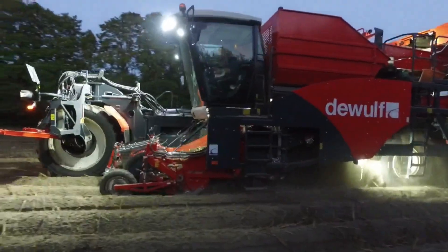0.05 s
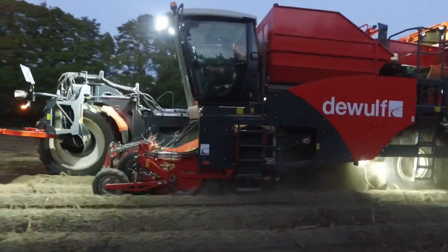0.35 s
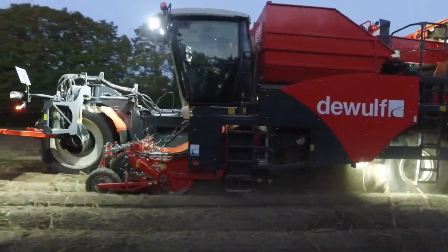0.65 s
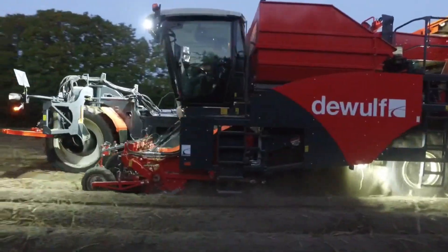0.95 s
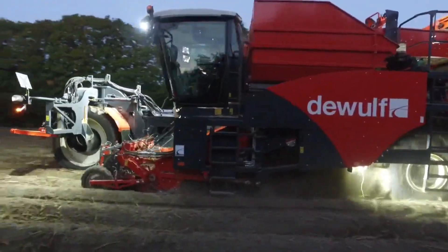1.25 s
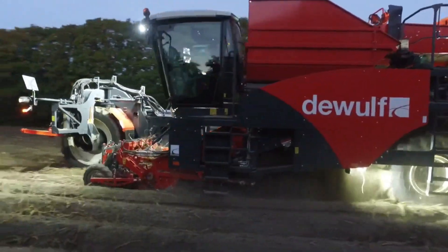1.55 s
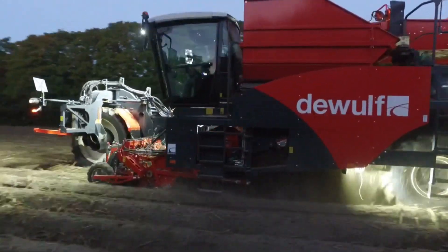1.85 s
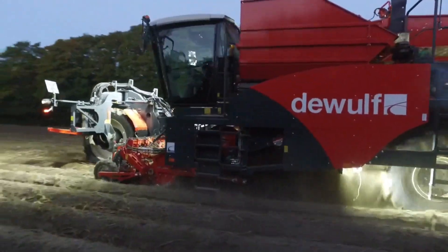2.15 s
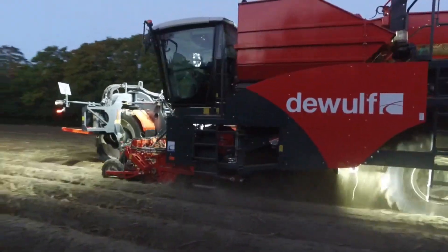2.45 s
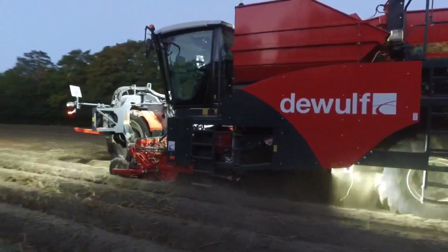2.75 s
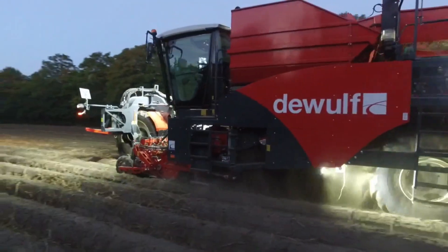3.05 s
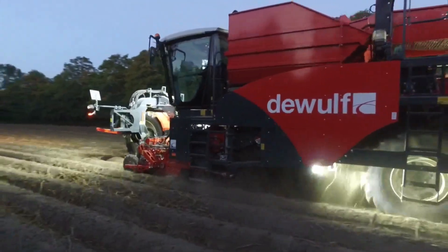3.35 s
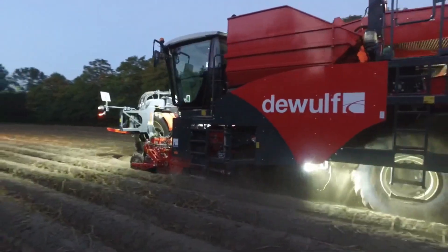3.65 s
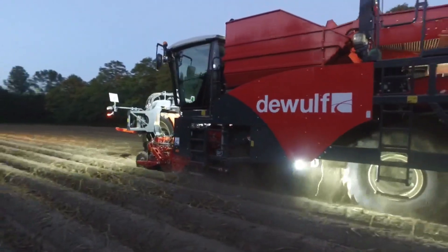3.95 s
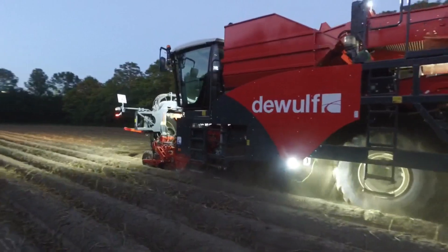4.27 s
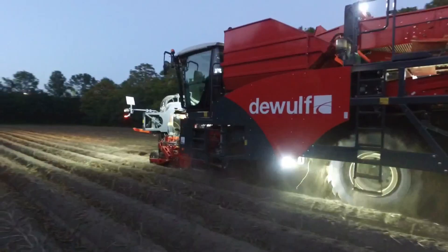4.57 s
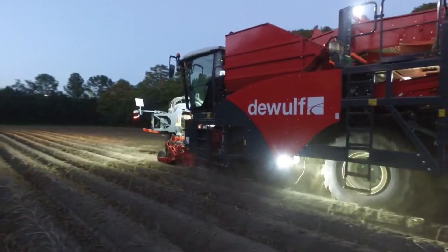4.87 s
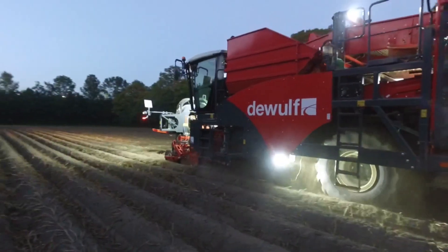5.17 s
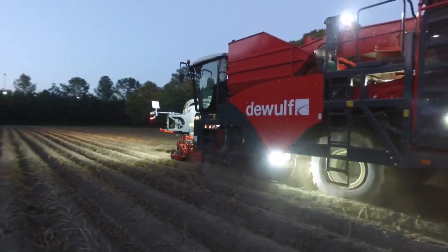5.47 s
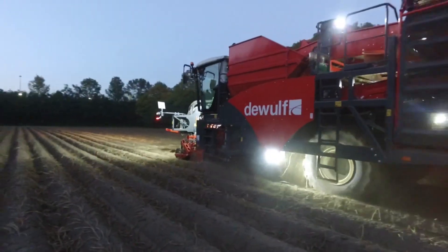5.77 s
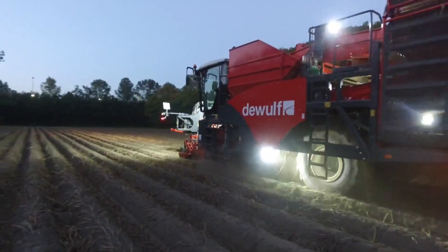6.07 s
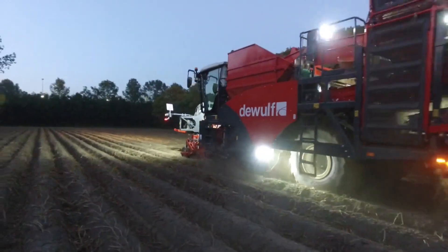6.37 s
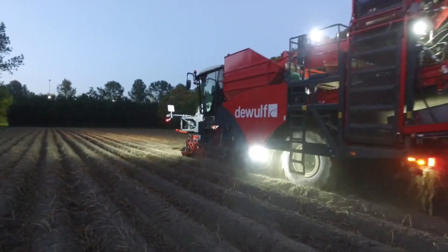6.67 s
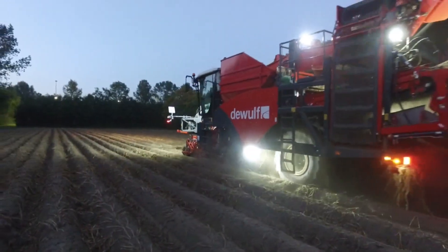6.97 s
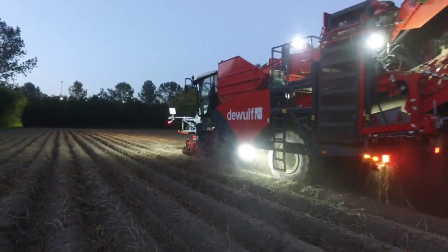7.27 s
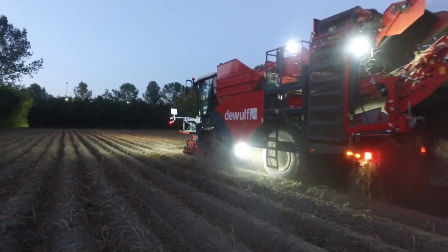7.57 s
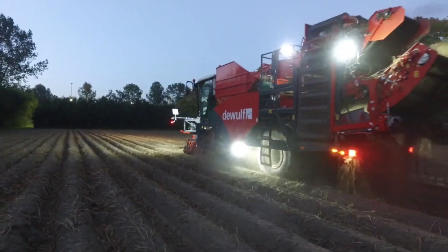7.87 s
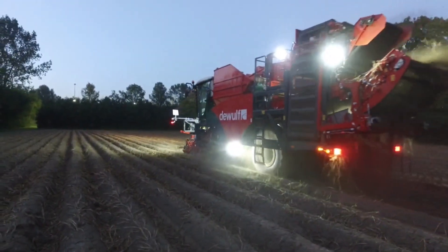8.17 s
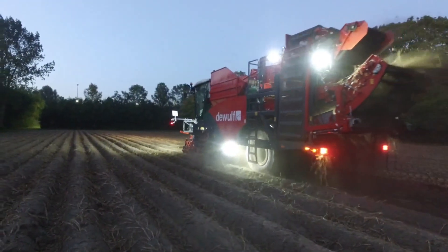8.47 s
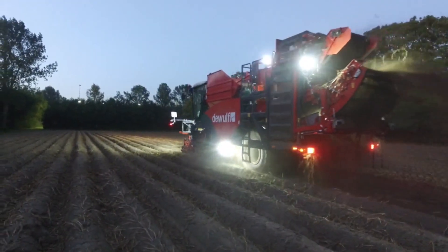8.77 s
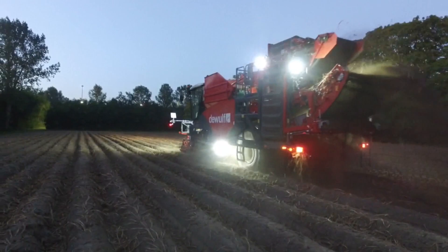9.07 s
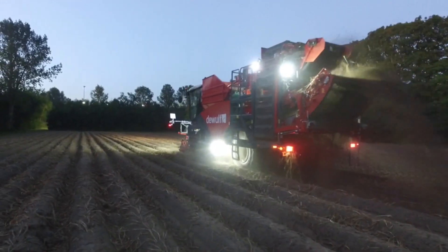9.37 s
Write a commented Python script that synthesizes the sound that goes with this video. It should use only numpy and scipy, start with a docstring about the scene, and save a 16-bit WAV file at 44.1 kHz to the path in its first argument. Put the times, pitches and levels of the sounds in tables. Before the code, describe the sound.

Steady roar of a farm harvester crawling by outdoors, its sieves and conveyor clattering over a low engine drone and wavering whine.

```python
"""In an open field a self-propelled potato harvester crawls past, its diesel held at working speed.
Each part swells and fades with its distance: first the droning exhaust and a whining hydraulic pump,
then the rattling sieve webs with soil hissing through them, last the tail and its conveyor.
Periodic forces (firings, pistons, blades) give tones, and dense random impacts give noise.
The conveyor drive sings under changing load; stones, grit and a clod strike the steel."""
import sys
import numpy as np
from scipy import signal
from scipy.fft import rfft, irfft, next_fast_len
from scipy.io import wavfile
from scipy.ndimage import map_coordinates

SR = 44100
rng = np.random.default_rng(int(sys.argv[2]) if len(sys.argv) > 2 else 0)


def digitize_waveform(pressure):
    """Quantize a signal to 16-bit integers and store it at the path in sys.argv[1].

    Rows of a 2-D input are taken as channels; values are limited to [-1, 1].
    """
    field = np.atleast_2d(pressure).T
    bounded = np.clip(field, -1, 1)
    quanta = np.round(bounded * 32767).astype(np.int16)
    wavfile.write(sys.argv[1], SR, quanta)


N = 424241
SPEED_M_PER_S, SOUND_M_PER_S = 1.2, 343
FIRING_HZ, PISTON_HZ = 60.0, 383.5

# Passing parts: (time when nearest [s], distance [m], level there [dB], loss per doubling [dB])
EXHAUST_PASS = (0.14, 8, -26.5, 18)
PANELS_PASS = (10, 20, -26, 8)
WEBS_PASS = (3.5, 4.5, -26, 4)
TAIL_PASS = (8, 1, -28, 5)
TURBO_PASS = (6, 0.5, -52, 2)
CONVEYOR_PASS = (7, 1.17, -31, 18)

# Envelopes of the steady sources: (time [s], relative level [dB])
FAN_LEVEL = [(0, -36.5), (1.3, -39.5), (3.1, -30.5), (3.6, -39.5), (4.25, -32.5), (5.3, -38), (6.3, -37),
             (6.95, -30.5), (7.8, -35.5), (9.62, -44)]
BOOM_LEVEL = [(0, -35), (2.3, -35.5), (3.2, -31.5), (4.3, -36.5), (5.6, -39), (6, -50), (6.7, -40),
              (7.2, -36.5), (7.9, -34.5), (8.4, -35), (9.62, -34.5)]
CHASSIS_LEVEL = [(0, -24.5), (1.35, -28), (2.3, -24), (3.6, -25), (4.3, -21.5), (4.9, -26.5), (5.9, -24.5),
                 (6.4, -29), (7.1, -29), (7.4, -25), (8.6, -25.5), (9.62, -28.5)]
SOIL_LEVEL = [(0, -40.5), (2, -38.5), (3.5, -36.5), (5.2, -35.5), (7.2, -36.5), (7.8, -36.5), (8.4, -38),
              (8.9, -39.5), (9.62, -40.5)]
# Noise spectra of the parts: (frequency [Hz], relative spectral density [dB])
CHASSIS_SPECTRUM = [(18, -62), (31, -39), (45, -33), (70, -6.5), (86, -5.5), (104, -2), (122, 1.5),
                    (142, 0), (170, -5.5), (230, -17.5), (400, -22.5), (1000, -78)]
PANEL_SIDE_SPECTRUM = [(120, -8), (200, 0), (245, 1.5), (280, 1.5), (330, 1.5), (370, -5.5), (430, -2),
                       (520, -12.5), (700, -7.5), (810, -4), (900, -10.5), (1100, -32), (2500, -43)]
PANEL_REAR_SPECTRUM = [(120, -9), (190, -6), (240, -3.5), (280, 3.5), (350, -8), (410, -3), (520, -10.5),
                       (620, -7.5), (750, -1.5), (830, -6), (940, -16), (1150, -9), (2500, -49.5)]
WEB_SIDE_SPECTRUM = [(530, -3), (900, -1.5), (1050, -4.5), (1370, -2), (1510, -3.5), (1820, -5),
                     (1970, -5.5), (2370, -4), (2570, -5), (2650, -4.5), (3130, -10.5), (3230, -10.5),
                     (3850, -15), (4960, -19.5), (6000, -18.5), (7800, -77), (13200, -120)]
WEB_REAR_SPECTRUM = [(530, -21), (900, 2), (959, -8), (1150, -6.5), (1260, -0.5), (1390, -3.5), (1610, -3),
                     (1810, 1.5), (2170, -2), (2350, 2), (2510, -0.5), (2780, -0.5), (3470, -7),
                     (4770, -29), (6000, -27), (7800, -48), (13200, -120)]
SOIL_SPECTRUM = [(2000, -4.5), (4000, 2.5), (5500, -0.5), (6800, -2.5), (7300, -0.5), (8100, -2),
                 (8700, -5.5), (9300, -28), (10600, -21), (12100, -9.5), (13000, -20), (14000, -18)]
CONVEYOR_SPECTRUM = [(700, -25), (1100, -1), (1600, -1.5), (2100, 0), (3000, -2.5), (4200, -10),
                     (5200, -28), (9000, -42)]
SHEET_SPECTRUM = [(150, -20), (400, -6), (560, -4), (690, 1), (1000, -8), (1600, -12), (2800, -9),
                  (3600, -15), (4300, -28), (7500, -31), (10000, -60)]
# Shaker harmonics: (multiple of its rate, level relative to the chassis envelope [dB])
SHAKER_HARMONICS = [(11, -9), (12, -11), (13, -17), (17, -16)]
# Web links rubbing: (peak time [s], half width [s], pitch [Hz], level [dB])
LINK_SQUEALS = [(2.91, .02, 4960, -41.5), (3.22, .03, 4960, -47), (3.37, .015, 4965, -41.5),
                (3.57, .02, 4930, -41), (4.44, .04, 4935, -45), (5, .04, 4940, -47), (3.08, .05, 4170, -46),
                (3.96, .04, 4180, -44), (4.33, .2, 4175, -47.5)]
# Loads of crop: (peak time [s], half width [s], centre [Hz], band width [octaves], level [dB])
CROP_LOADS = [(6.61, .025, 3700, .2, -34), (6.78, .04, 3600, .2, -39), (6.98, .07, 4000, .15, -39.5),
              (7.1, .035, 2200, .4, -28.5), (7.85, .03, 3900, .2, -35.5), (7.97, .1, 3420, .05, -44),
              (8.26, .045, 3470, .05, -38), (8.46, .05, 3440, .05, -42), (8.94, .06, 2400, .5, -33.5),
              (9.26, .045, 2300, .5, -33), (9.48, .08, 2200, .5, -34)]
# Spills of grit: (time [s], relative level [dB], centre [Hz], t60 [s])
GRIT_SPILLS = [(.287, -33, 4700, .1), (.511, -33, 4300, .08), (.758, -35, 4200, .05),
               (1.318, -39, 6500, .05), (1.45, -38, 4500, .3), (1.508, -31.5, 3700, .15),
               (1.537, -30.5, 4800, .22), (1.562, -30, 2700, .12), (1.595, -32.5, 4200, .2),
               (1.636, -35, 6800, .13), (1.711, -31, 5000, .06), (2.312, -34.5, 5300, .06),
               (2.461, -33.5, 4530, .11), (2.463, -37, 7400, .11), (3.3, -34.5, 3900, .14),
               (3.465, -35, 3700, .09), (5.241, -34, 5500, .08), (5.473, -34, 5200, .07),
               (7.85, -35, 5600, .1), (8.628, -41.5, 6900, .15)]
# Blows of one tumbling clod: (time [s], level [dB], treble gain [dB])
CLOD_BLOWS = [(8.583, -26, 0), (8.596, -20.5, -3), (8.607, -20.5, 8), (8.6285, -13, -1),
              (8.6385, -11.5, -8), (8.665, -21.5, 6), (8.698, -24, -12)]
# Stones on steel: (time [s], relative level [dB], ring centre [Hz], thud gain [dB], thud pitch [Hz])
STONE_HITS = [(.478, -17, 2000, -12, 700), (.511, -16.5, 2900, -14, 700), (.5487, -14.5, 3000, -8, 600),
              (1.5374, -15, 3400, -6, 800), (1.711, -7.8, 1900, 2.5, 660), (2.0046, -13.5, 1900, -8, 800),
              (2.312, -15.5, 3200, -12, 800), (2.804, -15.5, 3000, -10, 700),
              (3.1936, -11.5, 2100, -3, 520), (3.3004, -15, 2600, -12, 600), (3.321, -13, 1500, -8, 900),
              (3.7204, -11.5, 3900, -9, 500), (3.743, -18, 1200, 4, 600), (4.0438, -6.3, 2050, -8, 800),
              (4.3458, -9, 1750, -2, 540), (4.413, -16, 1700, -8, 900), (4.6234, -11.5, 1600, -1, 520),
              (4.7087, -12.5, 1650, -14, 900), (4.913, -6.2, 2950, -4.5, 560), (5.2048, -9, 2750, -5, 950),
              (5.473, -15.5, 3700, -9, 500), (5.7905, -13.3, 2600, 4.5, 570),
              (6.6198, -14.5, 3600, -8, 600), (6.866, -15, 2400, -10, 700)]
# Modes of the frame: (frequency [Hz], relative level [dB], t60 [s])
FRAME_MODES = [(800, -4, .04), (1000, -4, .04), (1324, -3, .036), (1620, -4, .034), (2030, -1, .036),
               (2300, -4, .032), (2660, -3, .03), (3020, -1.5, .036), (3390, -7, .028), (3770, -9, .026),
               (4200, -13, .022), (4870, -17, .02)]
# Conveyor drive under load: (time [s], pitch [Hz], level [dB])
DRIVE_TONE = [(0, 835, -41), (.7, 800, -39), (1, 822, -37), (1.35, 852, -38), (1.68, 794, -35),
              (1.9, 798, -29), (2.12, 809, -25.7), (2.25, 834, -35), (2.52, 812, -35.5), (2.72, 836, -35.5),
              (3.6, 815, -40), (6.3, 808, -41), (7.1, 800, -42), (7.45, 772, -42), (7.56, 756, -31),
              (7.7, 714, -33), (7.8, 735, -36), (7.92, 742, -31), (8.05, 735, -41), (8.25, 680, -31.5),
              (8.38, 705, -33), (8.5, 690, -40), (8.66, 682, -30), (8.78, 680, -40), (8.87, 700, -32),
              (8.97, 745, -33.5), (9.15, 700, -37), (9.62, 735, -45)]
# Pump whine: (time [s], first partial [dB], second partial before its trim [dB])
PUMP_LEVELS = [(0, -42, -38), (.7, -43, -33), (1.05, -45, -46), (1.35, -40, -35), (1.65, -35.5, -32.5),
               (1.95, -41, -31), (2.2, -43, -44), (2.55, -42, -36), (2.9, -42, -32.5), (3.15, -44, -36),
               (3.45, -46, -31.5), (3.8, -35, -42), (4.05, -44, -32.5), (4.2, -48, -35), (4.35, -48, -32),
               (4.65, -47, -37), (5, -46, -44), (5.3, -45, -34), (5.58, -43, -36.5), (5.72, -31, -38),
               (6.3, -30.5, -32.5), (6.6, -39, -34.5), (7, -44, -40), (7.3, -33, -45), (7.8, -29, -34),
               (8.1, -35.5, -41), (8.7, -36, -45), (9.62, -44, -45)]
# Pump overtones: (multiple of the piston rate, level beside the cab [dB], level behind [dB])
PUMP_OVERTONES = [(3, -44.5, -51), (4, -45, -50), (5, -43, -51.5), (6, -40, -45.5), (7, -44, -48)]
# Squeals of a hydraulic pipe: (peak time [s], level [dB], half width [s])
PIPE_SQUEALS = [(.08, -48, .03), (.47, -46, .03), (.77, -41.5, .03), (.96, -36.5, .04)]
# Exhaust orders: (multiple of the firing rate, relative level [dB])
EXHAUST_ORDERS = [(1, 1.5), (1.5, -14.5), (2, -5), (3.5, -25), (4.5, -20.5), (5, -17.5)]


def amp(db):
    """Decibels to amplitude ratio."""
    return 10 ** (np.asarray(db) / 20)


def unit(x):
    """Normalisation to rms 1."""
    return x / np.sqrt(np.mean(x ** 2) + 1e-20)


def clock(size=N):
    """The time of each sample in seconds."""
    return np.arange(size) / SR


def curves(rows):
    """Linear interpolation in time of each column after the first."""
    times, *columns = np.transpose(rows)
    return [np.interp(clock(), times, column) for column in columns]


def noise(size=N):
    """Gaussian white noise."""
    return rng.standard_normal(size)


def wobble(rate):
    """Smooth random modulation: a spline through rate knots a second."""
    return map_coordinates(noise(int(N * rate / SR) + 4), [clock() * rate])


def swell(peak_s, half_width_s):
    """A Gaussian envelope; the half width is its standard deviation."""
    return np.exp(-.5 * ((clock() - peak_s) / half_width_s) ** 2)


def phase(hz):
    """Phase as the integral of frequency."""
    return 2 * np.pi * np.cumsum(hz) / SR


def filtered(x, response):
    """Filtering as multiplication of the spectrum by a frequency response."""
    size = next_fast_len(len(x) + 8192)
    return irfft(rfft(x, size) * response(np.fft.rfftfreq(size, 1 / SR)), size)[:len(x)]


def coloured(x, spectrum):
    """Spectral shaping by (frequency [Hz], level [dB]) points, at rms 1."""
    points_hz, db = np.transpose(spectrum)
    return unit(filtered(x, lambda hz: amp(np.interp(np.log(hz + 1), np.log(points_hz), db))))


def banded(x, centre_hz, octaves):
    """A band-pass, Gaussian in log frequency, at rms 1."""
    return unit(filtered(x, lambda hz: np.exp(-.5 * (np.log2((hz + 1) / centre_hz) / octaves) ** 2)))


def rattle(rate, spread_db, t60):
    """Incoherent impacts add in power: rate random contacts a second, each a dying noise burst."""
    contacts = rng.random(N) < rate / SR
    power = contacts * amp(spread_db * np.clip(noise(), -2, 2)) ** 2
    decay = amp(-60 * clock(SR // 8) / t60) ** 2
    envelope = np.sqrt(np.abs(signal.fftconvolve(power, decay)[:N]))
    return unit(envelope * noise())


def add(track, s, sound):
    """Superposition of a sound on the track at s seconds."""
    start = round(s * SR)
    track[start:start + len(sound)] += sound[:N - start]


def travelled(nearest_s):
    """Uniform motion: metres that a part has gone beyond its nearest point."""
    return SPEED_M_PER_S * (clock() - nearest_s)


def going_by(nearest_s, distance_m, db, doubling_db):
    """Distance law in dB; shielded parts lose more than 6 dB per doubling."""
    return db - doubling_db * np.log2(np.hypot(1, travelled(nearest_s) / distance_m))


def doppler(nearest_s, distance_m):
    """Doppler ratio: slightly sharp on approach, flat on retreat."""
    metres = travelled(nearest_s)
    return 1 - SPEED_M_PER_S / SOUND_M_PER_S * metres / np.hypot(metres, distance_m)


def crossfade(side, rear, start_s, end_s):
    """Equal-power crossfade from the machine's flank to its tail."""
    share = np.clip((clock() - start_s) / (end_s - start_s), 0, 1)
    return np.sqrt(1 - share) * side + np.sqrt(share) * rear


def turbocharger(pitch_hz=7942, jitter=.0014):
    """Shielding: the thin whistle escapes through a gap as the engine bay goes by."""
    turn = phase(pitch_hz * (1 + jitter * wobble(30)))
    return amp(going_by(*TURBO_PASS)) * np.sqrt(2) * np.sin(turn)


def fan(blade_hz=273, jitter=.0277, flutter_db=3):
    """Blade-passage tone, broadened by the turbulent air that the blades chop."""
    db, = curves(FAN_LEVEL)
    flutter = amp(flutter_db * wobble(20))
    turn = phase(blade_hz * (1 + jitter * wobble(30)))
    return amp(db) * unit(flutter * np.sin(turn))


def sheet_boom(centre_hz=590, octaves=.33, trim_db=-.6):
    """A broad resonance of the side sheets gives a hollow boom that comes and goes."""
    db, = curves(BOOM_LEVEL)
    return amp(db + trim_db) * banded(noise(), centre_hz, octaves)


def shaker(rate_hz=FIRING_HZ / 5, jitter=.02, flutter_db=2):
    """Forced vibration: the sieve shaker turns once in five firings and makes the chassis throb."""
    chassis_db, = curves(CHASSIS_LEVEL)
    out = np.zeros(N)
    for k, db in SHAKER_HARMONICS:
        flutter = amp(flutter_db * wobble(8))
        turn = phase(k * rate_hz * (1 + jitter * wobble(12)))
        out += amp(chassis_db + db) * unit(flutter * np.sin(turn))
    return out


def bodywork(rumble_trim_db=-2, throb_db=1, sway_db=.75):
    """Structure-borne noise: the chassis radiates a low rumble and the panels a roar."""
    chassis_db, = curves(CHASSIS_LEVEL)
    rumble_db = chassis_db + rumble_trim_db + throb_db * wobble(11)
    rumble = amp(rumble_db) * coloured(noise(), CHASSIS_SPECTRUM)
    panel_db = going_by(*PANELS_PASS) + sway_db * wobble(7)
    side = coloured(noise(), PANEL_SIDE_SPECTRUM)
    rear = coloured(noise(), PANEL_REAR_SPECTRUM)
    return rumble + amp(panel_db) * crossfade(side, rear, start_s=5.73, end_s=8.48)


def soil(flow_db):
    """Crumbs sift through the webs so densely that their impacts merge into a hiss."""
    return amp(flow_db) * coloured(rattle(rate=3200, spread_db=3, t60=.02), SOIL_SPECTRUM)


def intake_chain(flow_db, relative_db=-12, ring_hz=4950, width_hz=60):
    """Colliding links jingle in a narrow resonance until the front has gone by."""
    contacts = rattle(rate=70, spread_db=2, t60=.09)
    jingle = unit(filtered(contacts, lambda hz: np.exp(-.5 * ((hz - ring_hz) / width_hz) ** 2)))
    return amp(flow_db + relative_db) * crossfade(jingle, 0, start_s=4, end_s=5.5)


def link_squeals(jitter=.0065, flutter_db=5):
    """Stick-slip friction of web links on their guides gives thin, broken squeals."""
    out = np.zeros(N)
    for s, width_s, hz, db in LINK_SQUEALS:
        flutter = amp(flutter_db * np.clip(wobble(45), -2, 1))
        turn = phase(hz * (1 + jitter * wobble(110)))
        out += amp(db) * swell(s, width_s) * unit(flutter * np.sin(turn))
    return out


def grit(trim_db=1, octaves=.23, grain_db=3.5):
    """Grit spatters on steel: decaying noise bands, made grainy by fast amplitude modulation."""
    out, t = np.zeros(N), clock(SR // 4)
    for s, db, centre_hz, t60 in GRIT_SPILLS:
        add(out, s, amp(db + trim_db - 60 * t / t60) * banded(noise(len(t)), centre_hz, octaves))
    return out * unit(amp(grain_db * wobble(350)))


def conveyor():
    """Impact noise of the crop rises and falls steeply as the conveyor's open end passes close by."""
    crop = rattle(rate=2400, spread_db=2.5, t60=.03)
    return amp(going_by(*CONVEYOR_PASS)) * coloured(crop, CONVEYOR_SPECTRUM)


def crop_surges():
    """Loads of crop scrape over the conveyor rods, each a brief swell of band-limited noise."""
    crop = rattle(rate=1200, spread_db=2.5, t60=.025)
    return sum(amp(db) * swell(s, width_s) * banded(crop, hz, octaves)
               for s, width_s, hz, octaves, db in CROP_LOADS)


def conveyor_drive(jitter=.006, flutter_db=1.5, free_hz=810, rough_per_hz=.00007):
    """Frequency modulation: the drive sings cleaner when loud, and roughens as it sags under load."""
    pitch_hz, db = curves(DRIVE_TONE)
    sag_hz = np.maximum(free_hz - pitch_hz, 0)
    roughness = jitter * np.clip(amp(-36 - db), .3, 2) + rough_per_hz * sag_hz
    flutter = amp(flutter_db * wobble(25))
    turn = phase(pitch_hz * (1 + roughness * wobble(45)))
    return amp(db) * unit(flutter * np.sin(turn))


def clod(t60=.09, attack_s=.0015, treble_hz=1100, sheet_hz=685, ring_db=-5):
    """Impacts of a clod excite a side sheet: hard corners scrape brightly, flat landings thud."""
    out, t = np.zeros(N), clock(SR // 4)
    attack = 1 - np.exp(-t / attack_s)
    for s, db, treble_db in CLOD_BLOWS:
        spectrum = [(hz, level + treble_db * (hz > treble_hz)) for hz, level in SHEET_SPECTRUM]
        ring = amp(ring_db) * np.sqrt(2) * np.sin(2 * np.pi * sheet_hz * rng.normal(1, .03) * t)
        scrape = coloured(noise(len(t)), spectrum)
        add(out, s, amp(db - 60 * t / t60) * attack * unit(scrape + ring))
    return out


def stones(attack_s=.0004, body_hz=900, detune=.025):
    """Modal ringing: each stone thuds on another place of the frame and favours other damped modes."""
    out, t = np.zeros(N), clock(SR // 8)
    attack = 1 - np.exp(-t / attack_s)
    for s, db, centre_hz, thud_db, thud_hz in STONE_HITS:
        ring = np.zeros(len(t))
        for hz, mode_db, t60 in FRAME_MODES:
            struck_db = mode_db + rng.normal(0, 1) - 5 * np.log2(hz / centre_hz) ** 2
            cycles = hz * rng.normal(1, detune) * t + rng.random()
            ring += amp(struck_db - 60 * t / t60) * np.sin(2 * np.pi * cycles)
        crack = amp(-60 * t / .025) * banded(noise(len(t)), centre_hz, octaves=.5)
        body = amp(-60 * t / .035) * banded(noise(len(t)), body_hz, octaves=.6)
        thud = amp(thud_db - 60 * t / .028) * np.sin(2 * np.pi * thud_hz * t)
        add(out, s, amp(db) * attack * (.36 * ring + .23 * crack + .17 * body + .9 * thud))
    return out


def pump(second_trim_db=-.5, jitter=.0013, flutter_db=2, blur_rad=.1, pipe_db=-46, fade_db_per_s=.2):
    """Piston strokes give harmonics that flutter as the machine shakes; the eighth squeals in a pipe."""
    first_db, second_db = curves(PUMP_LEVELS)
    t = clock()
    squeals = sum(amp(db) * swell(s, width_s) for s, db, width_s in PIPE_SQUEALS)
    singing = amp(pipe_db - fade_db_per_s * t + flutter_db * wobble(13))  # the pipe turns away
    turn = phase(PISTON_HZ * doppler(nearest_s=2.6, distance_m=4) * (1 + jitter * wobble(35)))

    def partial(k):
        """Harmonic k, broadened by phase modulation in proportion to k."""
        blur = blur_rad * k * wobble(60)
        flutter = amp(flutter_db * wobble(14))
        return unit(flutter * np.sin(k * turn + blur + 2 * np.pi * rng.random()))

    behind = t / t[-1]
    overtones = sum(amp(side + (rear - side) * behind) * partial(k) for k, side, rear in PUMP_OVERTONES)
    whine = amp(first_db) * partial(1) + amp(second_db + second_trim_db) * partial(2)
    return whine + overtones + (singing + squeals) * partial(8)


def sieve_webs(feed_db):
    """Random impacts of rods and pebbles, heard first from the flank and then from the tail."""
    rods = rattle(rate=2600, spread_db=3, t60=.025)
    pebbles = amp(-13) * rattle(rate=28, spread_db=2, t60=.035)
    flank = amp(going_by(*WEBS_PASS) + feed_db) * coloured(rods + pebbles, WEB_SIDE_SPECTRUM)
    tail = amp(going_by(*TAIL_PASS) + feed_db) * coloured(rods, WEB_REAR_SPECTRUM)
    return crossfade(flank, tail, start_s=5.7, end_s=7.05)


def exhaust(hunt=.0026, fundamental_flutter_db=1, upper_flutter_db=3):
    """Periodic firing at a governed rate gives a harmonic drone; unequal cylinders add half orders."""
    turn = phase(FIRING_HZ * (1 + hunt * wobble(3.94)))
    drone = np.zeros(N)
    for order, db in EXHAUST_ORDERS:
        flutter_db = (fundamental_flutter_db if order == 1 else upper_flutter_db) * wobble(7.2)
        drone += amp(db + flutter_db) * np.sin(order * turn + 2 * np.pi * rng.random())
    return amp(going_by(*EXHAUST_PASS)) * np.sqrt(2) * drone


def scene():
    """Free-field superposition of all parts of the machine, in one channel."""
    tones = exhaust() + pump() + conveyor_drive() + fan() + turbocharger() + shaker()
    structure = bodywork()
    feed_db = .56 * wobble(7)  # the crop comes up the webs unevenly
    flow_db = curves(SOIL_LEVEL)[0] + feed_db
    sifting = sieve_webs(feed_db) + soil(flow_db) + intake_chain(flow_db)
    running = tones + structure + sifting + sheet_boom() + conveyor()
    return (running + link_squeals() + crop_surges() + stones() + grit() + clod())[None]


def record(dry, low_hz=32, top_hz=14000):
    """Band limiting: a steep roll-off in the deep bass and a sharp cut in the high treble."""
    band = lambda hz: (hz < top_hz) * hz ** 6 / (hz ** 6 + low_hz ** 6)
    return np.array([filtered(channel, band) for channel in dry])


dry = scene()
out = record(dry)
digitize_waveform(out)
```